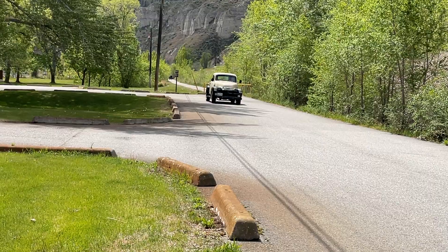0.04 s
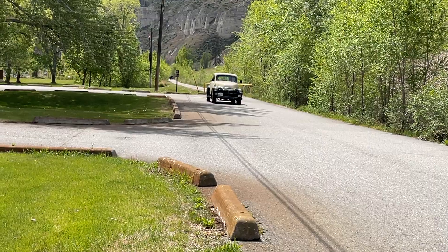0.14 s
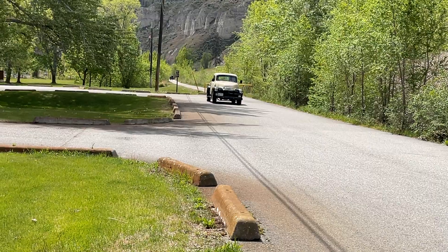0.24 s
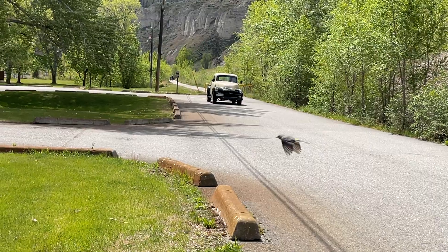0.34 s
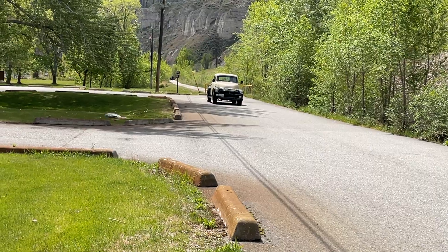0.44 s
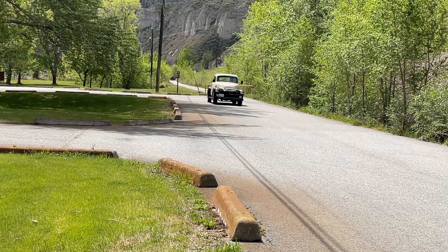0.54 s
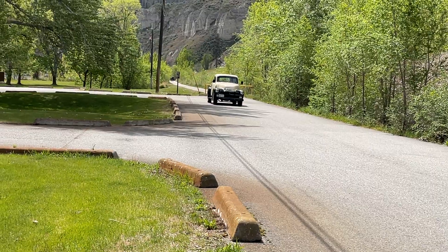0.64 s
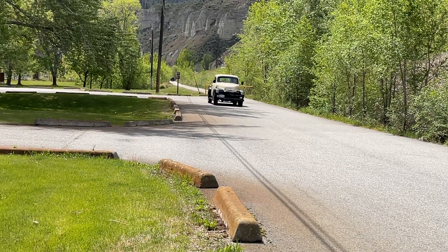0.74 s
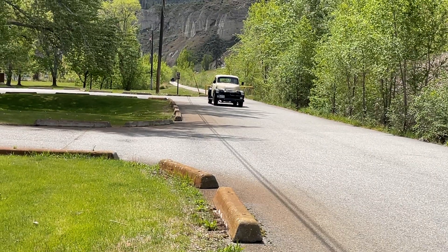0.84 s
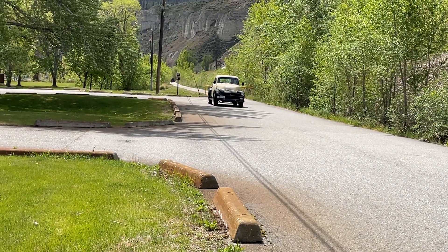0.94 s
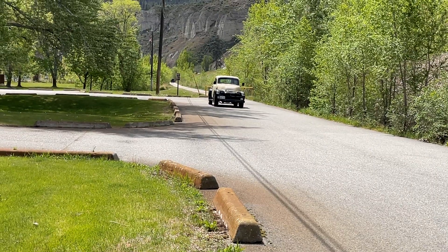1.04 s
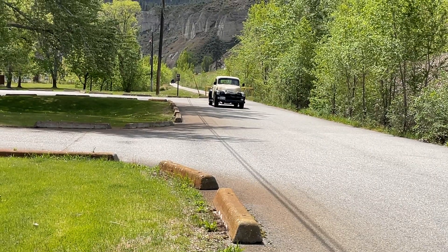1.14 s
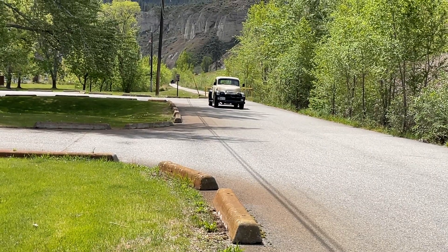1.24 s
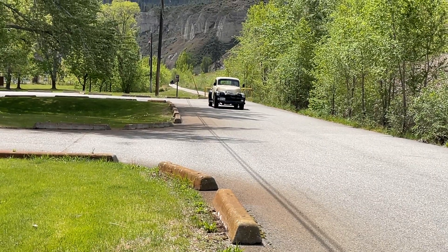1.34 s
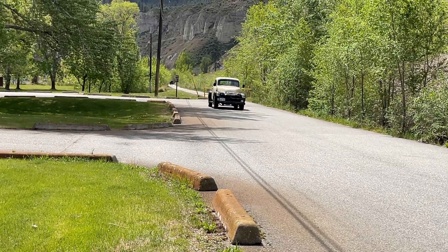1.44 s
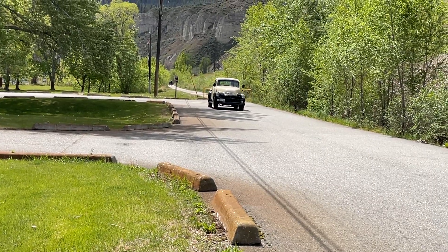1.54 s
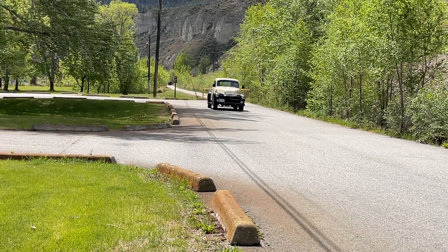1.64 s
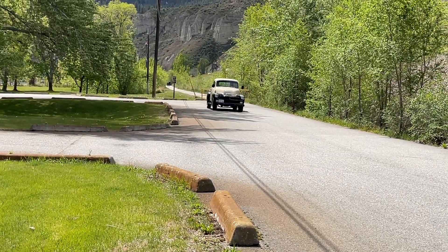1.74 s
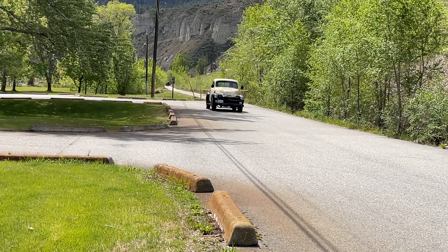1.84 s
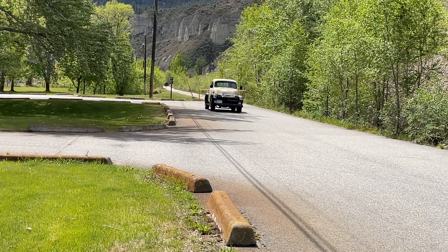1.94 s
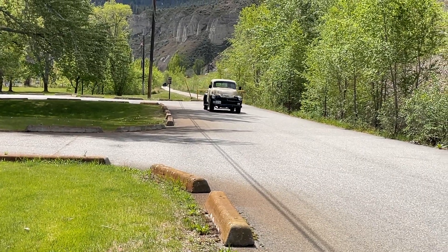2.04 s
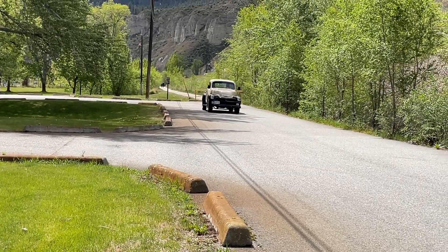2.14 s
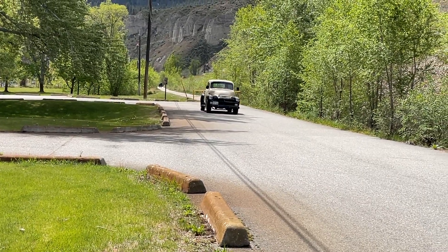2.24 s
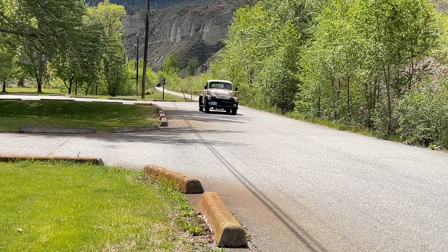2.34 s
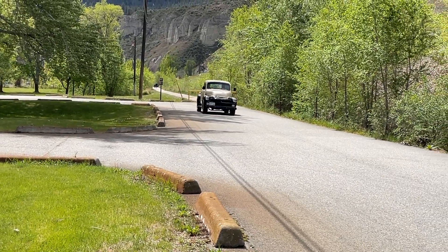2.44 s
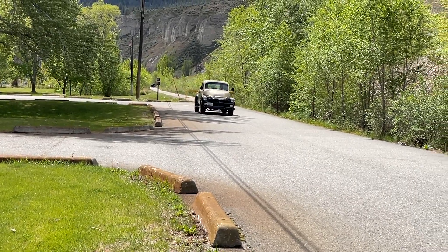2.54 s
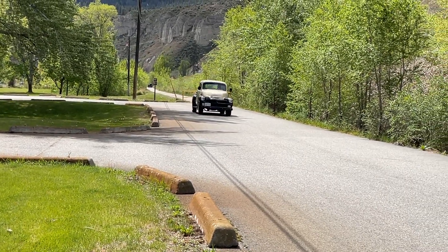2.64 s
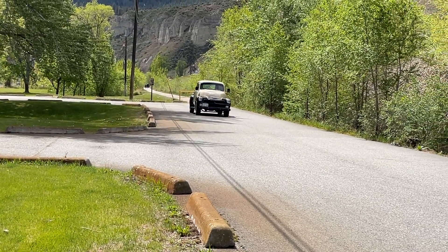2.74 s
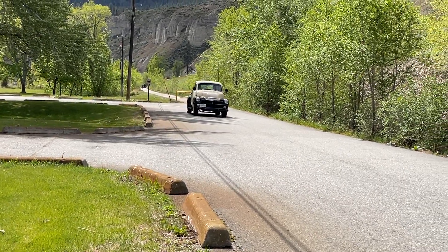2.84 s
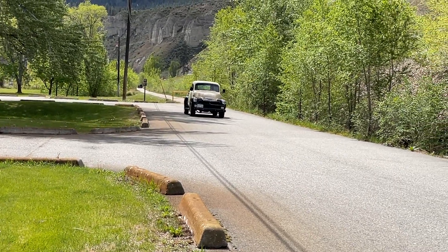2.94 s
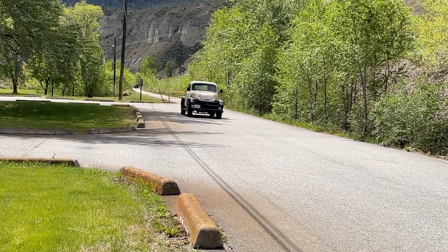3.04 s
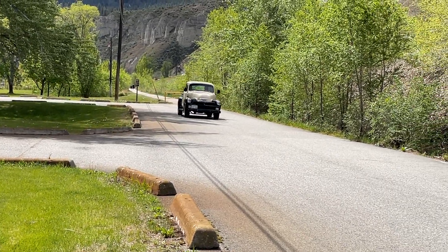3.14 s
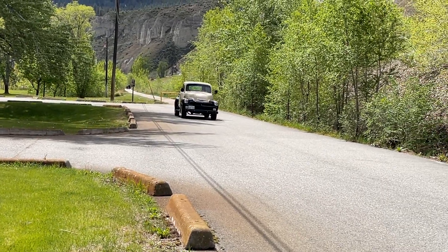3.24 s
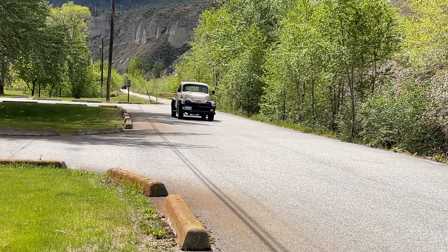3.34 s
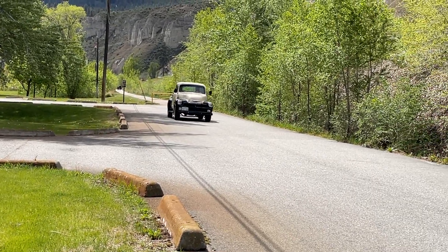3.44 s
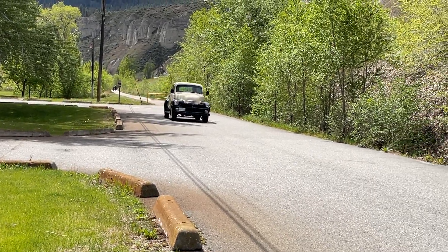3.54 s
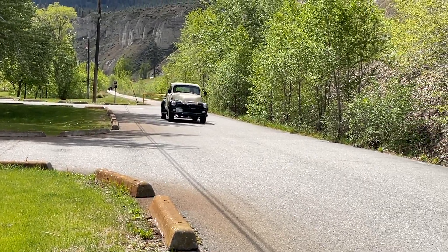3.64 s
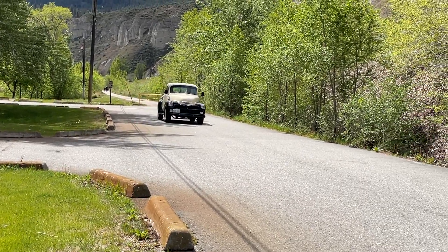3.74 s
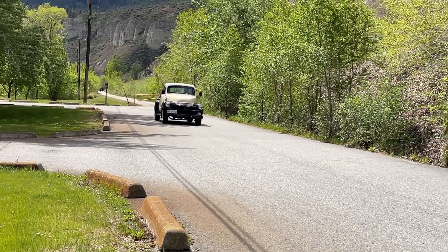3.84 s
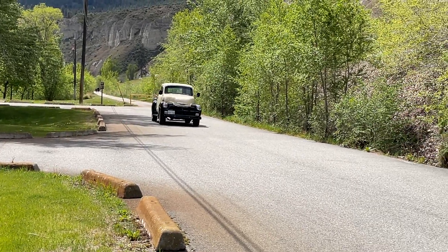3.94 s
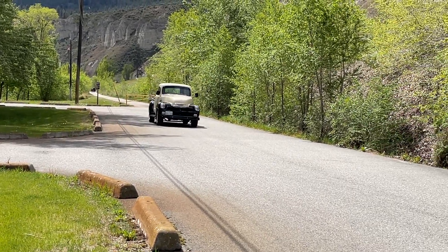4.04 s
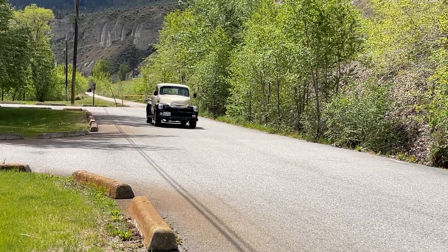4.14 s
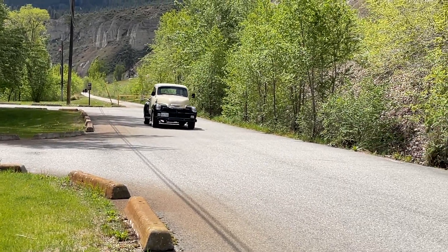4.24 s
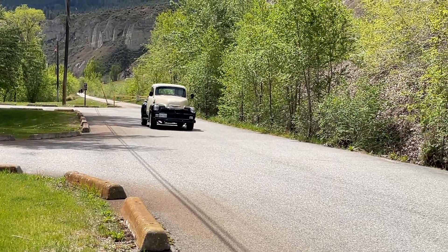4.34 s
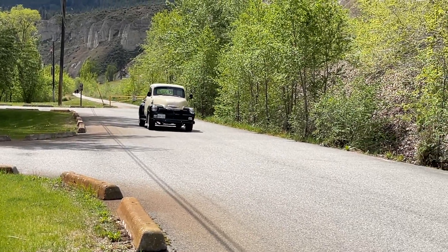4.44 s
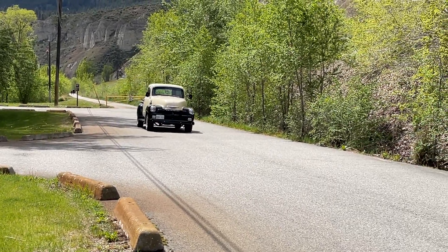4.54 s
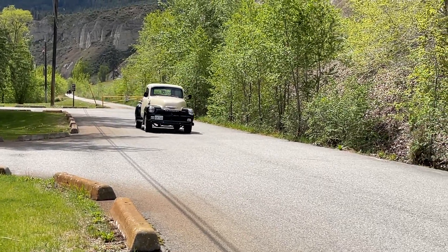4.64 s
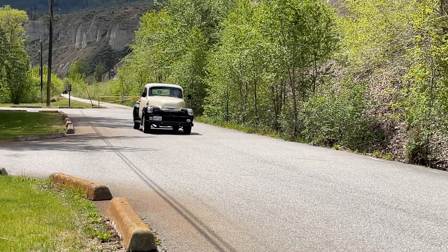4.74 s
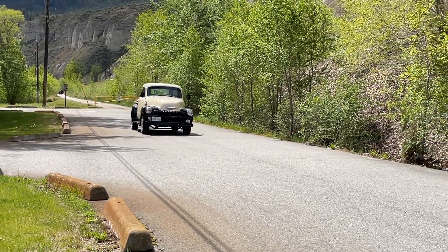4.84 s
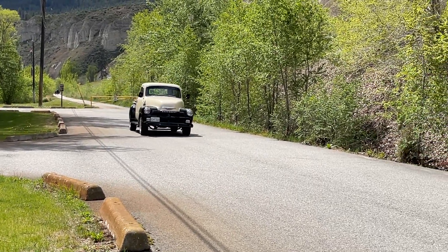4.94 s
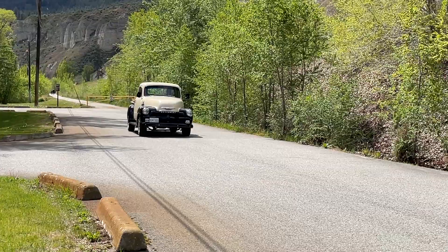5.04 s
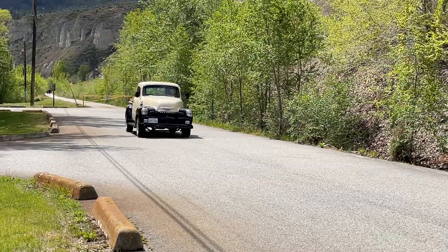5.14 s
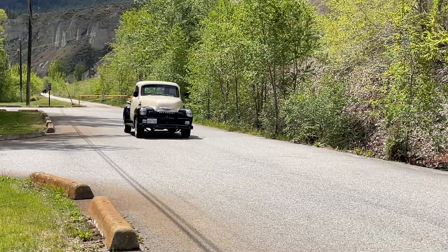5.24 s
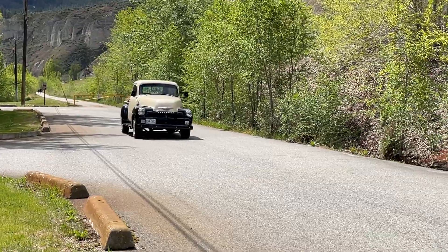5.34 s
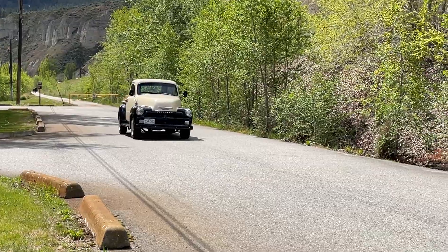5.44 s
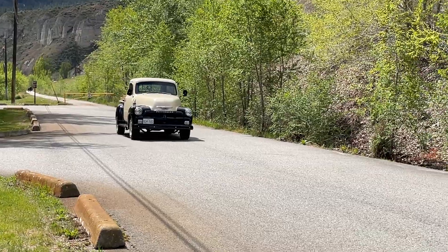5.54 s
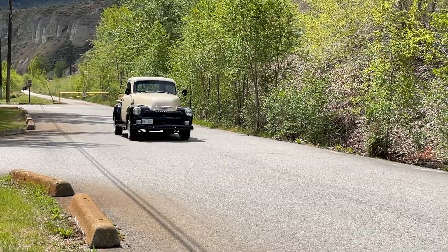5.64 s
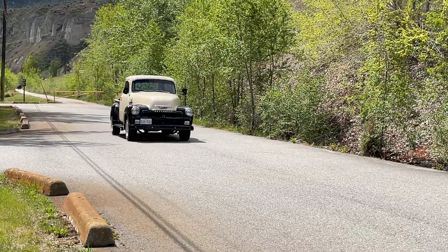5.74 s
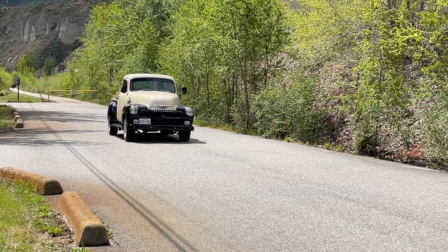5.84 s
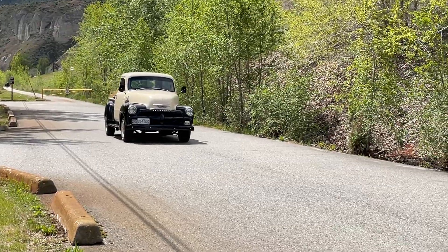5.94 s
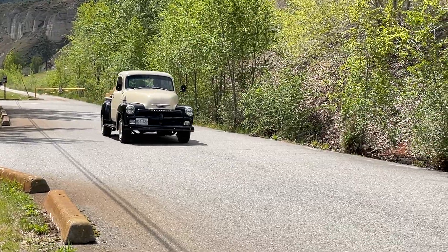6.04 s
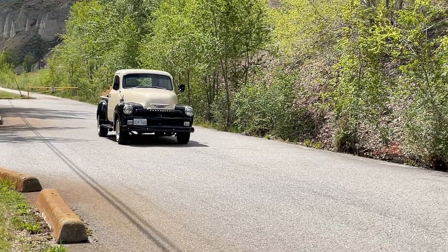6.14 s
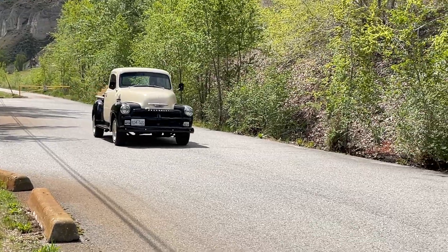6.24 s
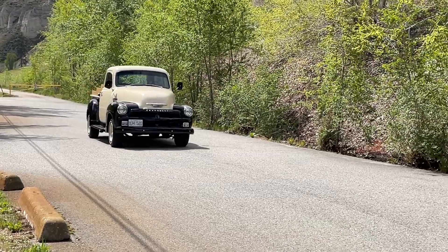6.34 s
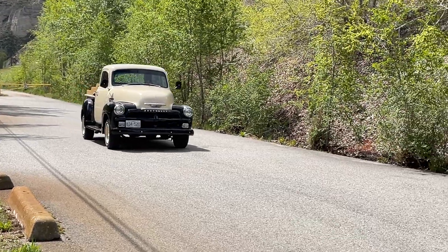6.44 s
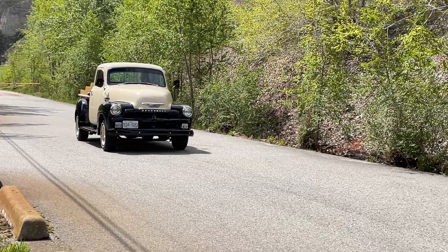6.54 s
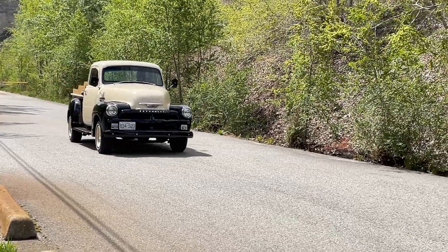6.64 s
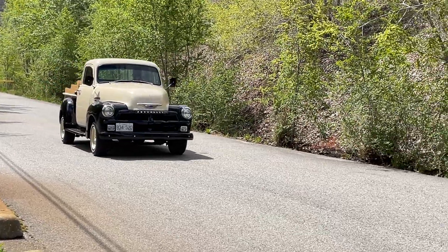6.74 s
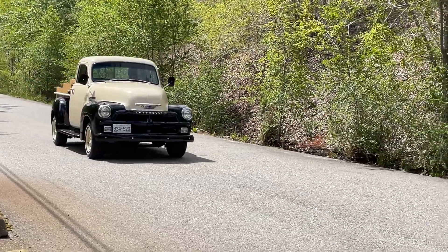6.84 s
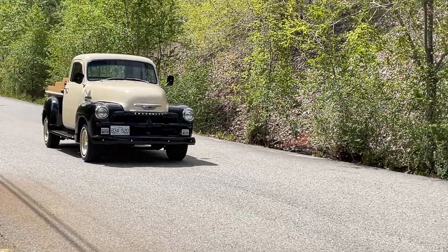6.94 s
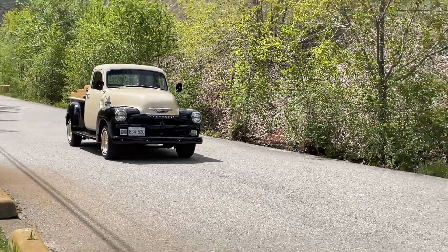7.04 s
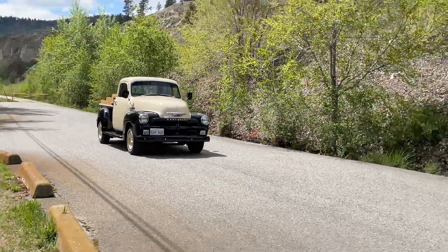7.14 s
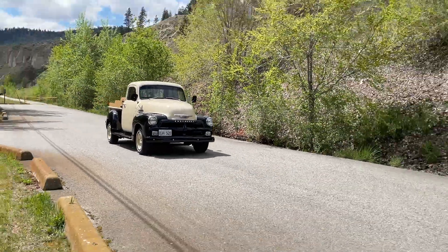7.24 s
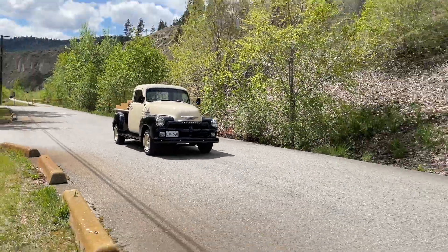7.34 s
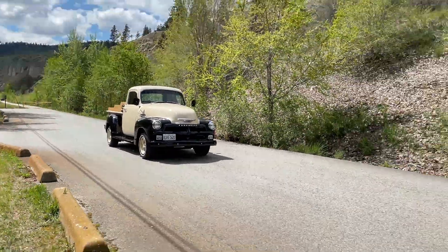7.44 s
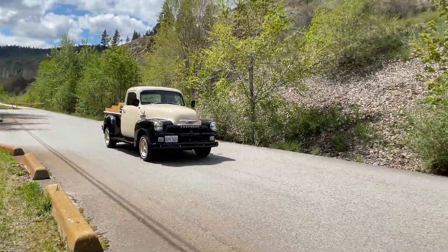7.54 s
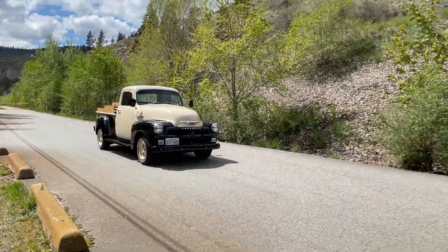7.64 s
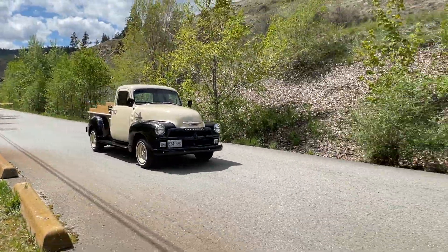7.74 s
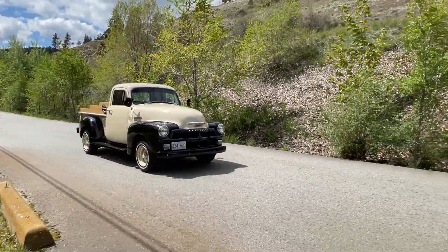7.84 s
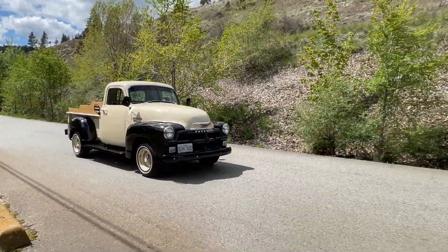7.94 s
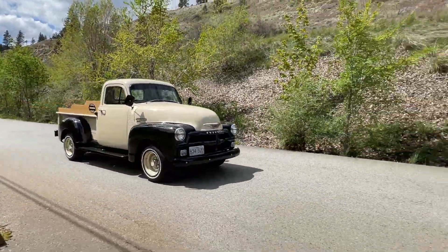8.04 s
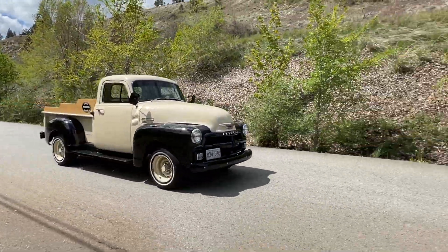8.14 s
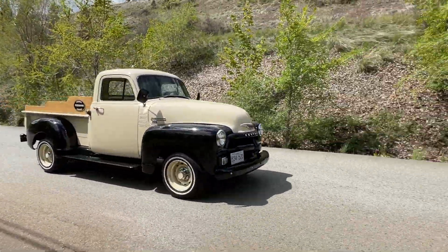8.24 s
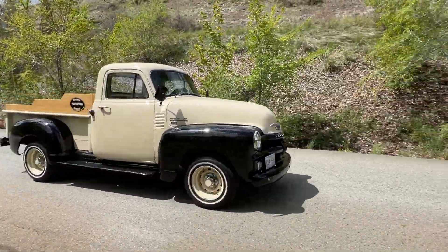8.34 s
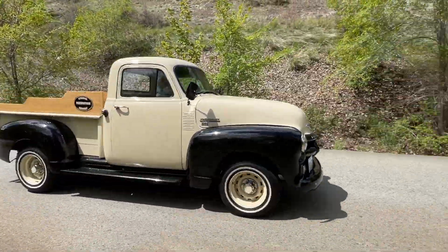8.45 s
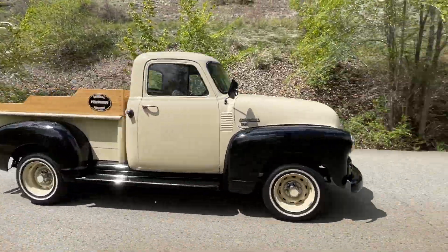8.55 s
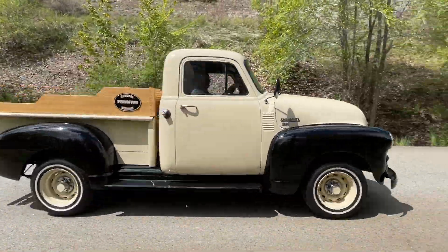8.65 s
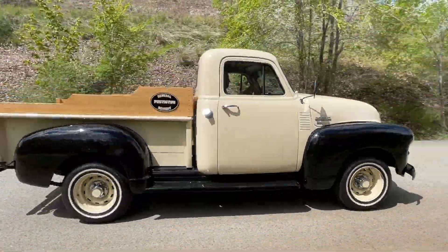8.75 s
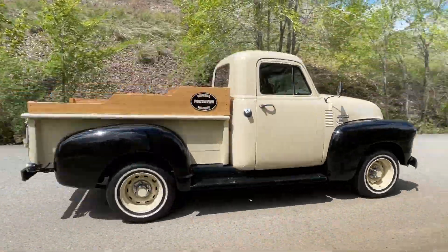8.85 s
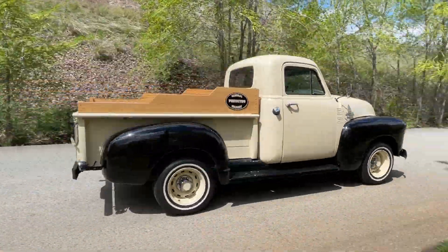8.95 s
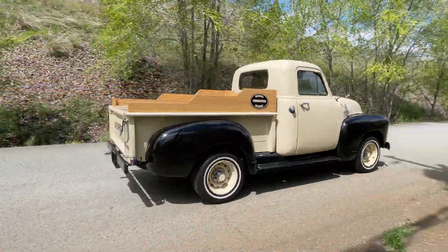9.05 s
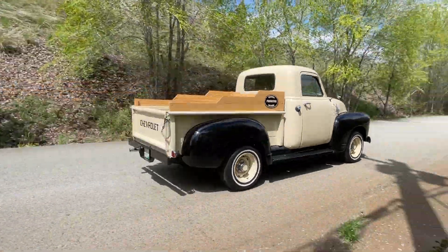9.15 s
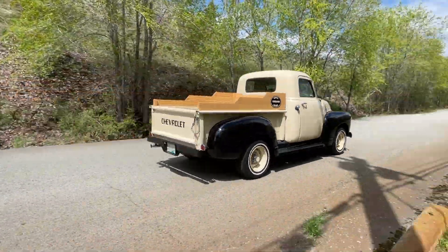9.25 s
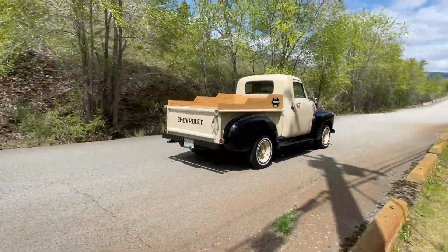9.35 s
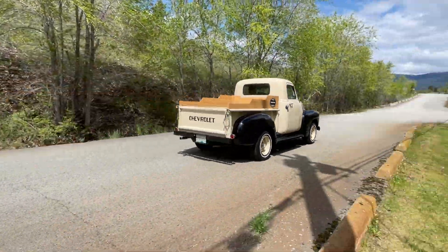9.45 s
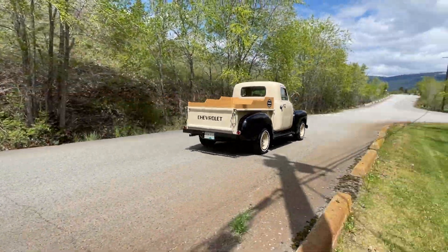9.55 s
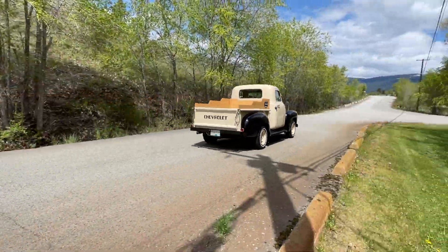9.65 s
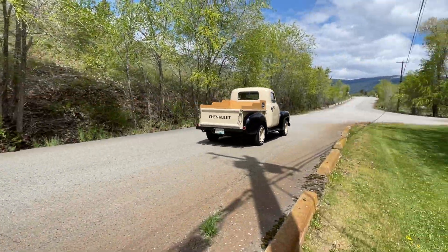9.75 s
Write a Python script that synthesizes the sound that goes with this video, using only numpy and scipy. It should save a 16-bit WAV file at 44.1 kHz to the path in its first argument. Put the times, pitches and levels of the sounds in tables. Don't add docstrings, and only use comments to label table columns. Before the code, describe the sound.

Open-air park road, stereo microphones close to the roadside. From 0 to 1.3 s a distant six-cylinder idle throbs low and faint under soft wind, with leaf rustles near 0.5, 0.95 and 1.25 s. Tiny high bird pips fall between about 0.9 and 2.3 s. At 1.3 s gear whine enters; from 1.6 s the engine climbs in low gear, surging unevenly, its whine brightening through metallic resonances to a peak near 4.3 s. Dull wind thumps strike at 1.5, 2.8, 3.3, 3.9, 4.9 and 5.6-5.8 s. The throttle lifts, whine vanishes and revs sink until 5.7 s. The next gear pulls lower and fuller, rising slowly. From 7.25 s the image widens; fan, exhaust and tyre roar swell to the loudest close pass around 8.7 s, leaning left, then the hiss fades while a deep drone recedes to 9.8 s.

```python
import sys
import numpy as np
from scipy import signal
from scipy.io import wavfile
from scipy.ndimage import uniform_filter1d

SR = 44100
rng = np.random.default_rng(int(sys.argv[2]) if len(sys.argv) > 2 else 0)


def decibels_to_gain(level_db):
    exponent = np.asarray(level_db, float) / 20
    return 10 ** exponent


def file_out(sig):
    cols = np.atleast_2d(sig).T
    lim = np.clip(cols, -1, 1)
    pcm = np.round(lim * 32767).astype(np.int16)
    wavfile.write(sys.argv[1], SR, pcm)


N = 431738
HOP, FRAME = 256, 1024

# time [s], level [dB].
WIND_DB = [(0, -49), (1.45, -34), (1.9, -33.5), (2.75, -36), (2.83, -28.5), (3.16, -30), (3.3, -30),
           (4.96, -25.5), (5.64, -28.5), (5.78, -27.5), (5.92, -32), (5.96, -45), (6.84, -32),
           (6.95, -40.5), (7.82, -34), (8.34, -29), (8.42, -25), (9.79, -31)]
# frequency [Hz], density [dB per Hz].
BUFFET_SPECTRUM = [(12, -41), (20, -26), (49, 9), (97, 16), (219, -17.5), (307, -48), (400, -4), (520, -53),
                   (880, -120)]
# start [s], peak [dB], pitch [Hz].
PUFFS = [(0.05, -31, 110), (1.429, -32.5, 110), (1.545, -16, 76.6), (1.618, -37, 116), (1.813, -20, 96),
         (1.908, -26, 78.1), (2.01, -22.5, 134), (2.048, -27, 103), (2.801, -17.5, 60), (3.345, -13, 60),
         (3.879, -15, 64.8), (4.91, -9.5, 90), (4.951, -13.5, 101), (5.569, -32, 68), (5.591, -18, 77.5),
         (5.614, -25, 86.1), (5.641, -15.5, 94.2), (5.672, -21, 102), (5.707, -15.5, 141),
         (5.746, -12.5, 98.5), (5.768, -23, 69.5)]

# time [s], firing rate [Hz].
FIRING_HZ = [(0, 39.6), (1.2, 39.1), (1.55, 42.6), (2.1, 56.5), (2.6, 69.1), (3.1, 86.1), (3.76, 108.4),
             (4, 119), (4.25, 125.7), (4.39, 128.8), (4.5, 123.6), (4.72, 110.5), (5.3, 83), (5.7, 73),
             (6.15, 74.5), (7.7, 84.5), (8.6, 91.6), (9.79, 97.5)]
# time [s], swing of firing rate [Hz].
LURCHES = [
    (1.76, 3.6),
    (2.26, 2.6),
    (2.68, 2.5),
    (3.15, 5.1),
    (3.54, 4.7),
]
LURCH_S, SETTLE_S = 0.07, 0.25
# time [s], level [dB].
TRUCK_DB = [(0, -66), (1.6, -63), (2.21, -61), (2.78, -55), (3.11, -51), (3.68, -43.5), (4.06, -39.5),
            (4.61, -39.5), (5.1, -46.5), (5.59, -51), (6.57, -45), (6.79, -44.5), (7.58, -39), (8, -36.5),
            (8.4, -33), (8.7, -32.5), (9.05, -34), (9.79, -42)]
# time [s], load [low gear 0, throttle lifted below 0, next gear 1].
LOAD = [
    (4.3, -0.12),
    (4.6, -0.62),
    (5.6, .3),
    (6.3, 0.61),
    (8.7, 1),
    (9.79, 1.4),
]
IDLE_DB, IDLE_END_S, IDLE_HZ, IDLE_WIDTH_HZ = -55, 1.36, 110, 46

# from [Hz], to [Hz].
BANDS_HZ = [
    (200, 600),
    (600, 2000),
    (2000, 7500),
    (9000, 13500),
]
# usual level [dB], share of level change [ratio], gain from load [dB],
# gain from open pair [dB], extra share when near [ratio].
ROAR_BANDS = [
    (-38.5, 0.69, 4, 0, -0.0007),
    (-36, 0.55, 4, 2.5, 0.046),
    (-45, 0.99, -1, -3, -0.027),
    (-67, 1.17, 3.5, -1.5, 0.61),
]
USUAL_DB, NEAR_DB = -45, 6
# frequency [Hz], density [dB per Hz].
BEAM_SPECTRUM = [(24, -40), (40, -33), (109, 8), (177, 0), (275, 3.5), (319, -2), (932, -3.5), (1720, -17),
                 (1890, -13), (2480, -21), (5820, -27), (7250, -45), (8390, -56.5), (9950, -53.5),
                 (13700, -67)]
# frequency [Hz], density [dB per Hz].
WIDE_SPECTRUM = [(40, -28), (90, -8.5), (370, -12), (630, 0.5), (800, -13), (1050, -10.5), (2100, -17),
                 (3400, -35.5), (5000, -46.5), (6000, -64.5), (7200, -26), (10500, -31.5), (12500, -31),
                 (13800, -42)]
# frequency [Hz], side above mid [dB].
BEAM_SIDE_DB = [(60, -21), (140, -13), (480, -17.5), (720, -16), (1300, -19.5), (1720, -5), (2000, -15.5),
                (2500, -23), (2800, -28), (5800, -35.5), (6300, -13), (8700, 15), (10300, -4.5),
                (11300, -2.5)]
# frequency [Hz], side above mid [dB].
WIDE_SIDE_DB = [(60, -13), (200, -9), (660, 16.5), (1200, 27), (2200, 9), (4000, 77), (6000, 37),
                (9000, -31), (10500, 5), (11300, -48), (13000, 13)]
# time [s], opening [beam 0 to open pair 1].
OPENING = [
    (7.25, 0.11),
    (7.45, 0.18),
    (7.9, 0.26),
]
# time [s], from [Hz], to [Hz], depth [dB].
PORT_NOTCH = [
    (7.3, 7980, 8800, -26),
    (7.62, 7800, 8850, -30),
    (7.7, 8200, 8950, -30),
    (7.88, 8850, 9250, -25),
    (8.05, 9000, 9250, -8),
    (9.79, 9000, 9250, -6),
]
# time [s], centre [Hz], depth [dB].
ROAD_DIP = [
    (8.3, 818, 2),
    (8.6, 890, -1.5),
    (9, 872, -2.5),
    (9.4, 735, -6),
    (9.79, 825, -3.5),
]
# time [s], lift near 3 kHz [dB].
TREAD_DB = [
    (7.2, 1),
    (7.6, 2.5),
    (7.9, 4.5),
    (8.3, 2.5),
    (8.7, 0.5),
]
HOOD_HZ, HOOD_WIDTH_HZ, HOOD_DB = 1865, 47, 3.5
# frequency [Hz], level [dB per bin].
LEAF_SPECTRUM = [(2200, -17), (3100, -28), (4000, 5), (5500, -2), (7000, -11.5), (9500, -27), (11500, -35),
                 (13500, -47)]
LEAVES_DB = -93.5
# centre [s], half length [s], lift [dB].
LEAF_GUSTS = [
    (.55, .25, 7),
    (.95, .13, 12),
    (1.24, .12, 11),
    (1.93, .16, 11),
]

# multiple of blade rate, level [dB].
FAN_LINES = [
    (2, 2),
    (3, 0.5),
    (4, 0),
    (7, -9.5),
]
# time [s], level [dB].
FAN_DB = [(0, -59.5), (2.7, -54), (3.45, -42), (3.7, -39), (4.4, -35.5), (4.8, -37.5), (5.3, -43.5),
          (5.6, -45), (6, -41), (7.28, -37), (8.1, -38), (8.9, -31), (9.2, -34), (9.79, -42)]
# time [s], blade rate over
BELT_RATIO = [(0, .916), (3.4, .92), (3.7, .912), (4.72, .917), (5.3, .913), (6.4, .907), (7.6, .917),
              (8.6, .895), (9.79, .891)]
# centre [Hz], width [Hz], gain [dB].
BAY_MODES = [(158.5, 41, -2), (236.3, 32.5, 1.5), (296.3, 36, 0), (349, 92, -5.5), (408, 60, -6.5),
             (465, 26, -3), (670, 66, 8), (769, 91, 8)]

# start [s], peak [dB], pitch [Hz].
PIPS = [(0.9158, -51, 3880), (1.3099, -53, 3900), (1.3758, -51, 3840), (1.4566, -53, 4050),
        (1.5359, -52, 3940), (1.586, -53.5, 4040), (1.6746, -69, 3870), (1.783, -52, 3830),
        (1.8218, -49, 3970), (2.0073, -50.5, 4030), (2.274, -53, 4090)]

# time [s], whine level [dB].
GEAR_DB = [(1.26, -51), (1.34, -44), (1.46, -46), (1.7, -43.5), (2.06, -41.5), (3, -36.5), (4.25, -29.5),
           (4.34, -36), (4.46, -49)]
# partial, level at middle revs [dB], slope [dB per Hz of firing rate].
TEETH = [(1, -0.5, 0), (2, 1, 0), (3, -6, -0.0777), (4, -9.5, -0.1769), (5, -19, 0.07)]
MIDDLE_HZ = 80
# centre [Hz], width [Hz], gain [dB].
CASE_MODES = [(319, 14, -6), (385, 23, 1), (466, 43, -5), (543, 60, -1.5), (657, 57, -2), (832, 58, -2.5),
              (879, 45, -0.5), (977, 40, -1.5), (1050, 58, 0), (1147, 120, -6.5), (1306, 61, -6.5),
              (1860, 60, -9)]

# time [s], level [dB].
EXHAUST_DB = [(1.8, -48), (2.05, -30), (2.55, -31), (2.75, -38), (3.45, -33.5), (3.7, -28), (4.55, -19.5),
              (4.95, -20.5), (5.1, -30), (6.2, -33), (6.6, -19.5), (6.85, -32), (7.5, -30), (7.7, -20),
              (8.05, -21), (8.3, -16), (8.66, -11), (9.79, -12.5)]
# frequency [Hz], gain [dB].
PIPE_RESPONSE = [(55, -22), (75, -16), (95, -7), (122, -0.5), (135, -3), (150, -15.5), (190, -20),
                 (260, -26.5)]
# crank order, level [dB], gain under load [dB].
PIPE_ORDERS = [
    (3, 0.5, 0),
    (4, -18, 3.5),
    (6, -1, -1),
]
# crank order, level above truck [dB].
UNEVEN_ORDERS = [(5, -27), (9, -17.5), (10, -22.5), (12, -26), (16, -23.5), (17, -21), (20, -21.5)]
TOP_GEAR_DB = 14
# time [s], level [dB].
NEXT_GEAR_DB = [(5.9, -65), (6.2, -49), (7.15, -43), (7.5, -41), (8.05, -36), (8.66, -43), (9.28, -40.5),
                (9.79, -35.5)]
# time [s], depth [dB].
ECHO_BEATS = [
    (8.48, -7),
    (8.98, -5.5),
]
BEAT_S = 0.14

# time [s], left above right [dB].
LEAN_DB = [(0, 2), (7.2, -1), (7.6, 3.5), (8.2, 4.5), (8.75, 13.5), (9.2, 11.5), (9.79, 4)]
# time [s], left late [samples].
LATE_SAMPLES = [
    (7.7, -1),
    (8.25, 1),
    (8.75, 5),
    (9.25, 2),
    (9.79, -2),
]


def evened(x):
    return x / np.sqrt(np.mean(abs(x) ** 2) + 1e-20)


def read(points, hz):
    f, value = np.transpose(points)
    return np.interp(np.log(hz + 1), np.log(f + 1), value)


def columns(rows, t):
    s, *values = np.transpose(rows)
    return [np.interp(t, s, v) for v in values]


def drift(t, fastest_hz, count=24):
    rates_hz = np.geomspace(fastest_hz / 20, fastest_hz, count)
    return evened(sum(np.sin(2 * np.pi * (f * t + rng.random())) / np.sqrt(f) for f in rates_hz))


def add(mix, s, sound):
    part = mix[round(s * SR):][:len(sound)]
    part += sound[:len(part)]


def power_sum_db(level_db):
    return 10 * np.log10((decibels_to_gain(level_db) ** 2).sum(axis=0))


def bell(x, centre, width):
    return np.exp(-((x - centre) / width) ** 2)


def after(rows, t):
    return np.clip(1 + (t - rows[0][0]) / 0.3, 0, 1)


def spectrum_axes():
    return np.arange(N // HOP + 5) * HOP / SR, np.fft.rfftfreq(FRAME, 1 / SR)


def noise(magnitude):
    a, b = rng.standard_normal(magnitude.T.shape + (2,)).T
    unit = signal.istft(a + 1j * b, nperseg=FRAME, noverlap=FRAME - HOP)[1]
    shaped = signal.istft((a + 1j * b) * magnitude, nperseg=FRAME, noverlap=FRAME - HOP)[1]
    return shaped[:N] * np.sqrt(len(magnitude)) / np.std(unit)


def tones(hz, lines, waver_db, stray_turns, start_s=-1, end_s=99):
    t, coarse = np.arange(N) / SR, np.arange(N // HOP + 2) * HOP / SR
    fade = np.clip(np.minimum(t - start_s, end_s + 0.05 - t) / 0.05, 0, 1)
    on = fade > 0
    turns = np.cumsum(np.interp(t, coarse, hz))[on] / SR
    out = np.zeros(N)
    for k, db in lines:
        level = np.interp(t[on], coarse, decibels_to_gain(db + waver_db * drift(coarse, 14.0)))
        stray = stray_turns * np.interp(t[on], coarse, drift(coarse, 14.0))
        out[on] += level * np.cos(2 * np.pi * (k * turns + stray))
    return np.sqrt(2) * out * fade


def ring_db(modes, hz):
    power = sum(decibels_to_gain(db) ** 2 / (1 + (2 * (hz - f) / width) ** 2) ** 2 for f, width, db in modes)
    return 10 * np.log10(power)


def wind():
    t, hz = spectrum_axes()
    shape_db = read(BUFFET_SPECTRUM, hz)
    shape_db = shape_db - power_sum_db(shape_db[hz < 90])
    level = decibels_to_gain(shape_db[:, None] + columns(WIND_DB, t)[0] + 2.1 * drift(t, 40.0))
    mid, side = noise(level), noise(level)
    u = np.arange(4000) / SR
    sag_s = 0.0034 * (1 - np.exp(-u / 0.0063))
    envelope = u / 0.0071 * np.exp(1 - u / 0.0053)
    for s, db, f in PUFFS:
        add(mid, s, decibels_to_gain(db) * np.sin(2 * np.pi * f * (u + sag_s)) * envelope)
    return mid, decibels_to_gain(-16.5) * side


def engine_speed(t):
    swing_hz = sum(f * np.tanh((t - s) / LURCH_S) * np.exp(-abs(t - s) / SETTLE_S) for s, f in LURCHES)
    return columns(FIRING_HZ, t)[0] + swing_hz


def idle(hz):
    lines = [(k / 3, IDLE_DB - 4.3 * ((hz * k / 3 - IDLE_HZ) / IDLE_WIDTH_HZ) ** 2) for k in range(4, 15)]
    return tones(hz, lines, 2, 0.06, end_s=IDLE_END_S)


def leaves_db(t, hz):
    gust_db = LEAVES_DB + sum(db * bell(t, s, half_s) for s, half_s, db in LEAF_GUSTS)
    return read(LEAF_SPECTRUM, hz)[:, None] + gust_db


def port_notch_db(t, hz):
    lo_hz, hi_hz, depth_db = columns(PORT_NOTCH, t)
    lo_hz = lo_hz + 130 * drift(t, 60.0)
    hi_hz = hi_hz + 130 * drift(t, 60.0)
    inside_hz = np.minimum(hz[:, None] - lo_hz, hi_hz - hz[:, None])
    return depth_db * np.clip(0.5 + inside_hz / 210.0, 0, 1)


def roar():
    t, hz = spectrum_axes()
    opening, load = columns(OPENING, t)[0], columns(LOAD, t)[0]

    def blend(beam, wide):
        return np.outer(read(beam, hz), 1 - opening) + np.outer(read(wide, hz), opening)

    shape_db = blend(BEAM_SPECTRUM, WIDE_SPECTRUM)
    change_db = columns(TRUCK_DB, t)[0] - USUAL_DB
    near_db = np.maximum(change_db - NEAR_DB, 0)
    gaps_db = []
    for (lo, hi), (db, share, load_db, open_db, extra) in zip(BANDS_HZ, ROAR_BANDS):
        band_db = db + share * change_db + load_db * load + open_db * opening + extra * near_db
        gaps_db.append(band_db - power_sum_db(shape_db[(hz >= lo) & (hz < hi)]))
    centres = np.log([np.sqrt(lo * hi) for lo, hi in BANDS_HZ])
    weights = np.transpose([np.interp(np.log(hz + 1), centres, row) for row in np.eye(len(BANDS_HZ))])

    patches = rng.standard_normal((len(t), len(hz))).T
    patches = evened(uniform_filter1d(uniform_filter1d(patches, size=8, axis=0), size=16, axis=1))
    lumps_db = (0.8 + 0.7 * opening) * patches + 0.25 * drift(t, 8.0)
    level_db = shape_db + weights @ gaps_db + lumps_db

    dip_hz, dip_db = columns(ROAD_DIP, t)
    level_db = level_db + after(ROAD_DIP, t) * dip_db * bell(hz[:, None], dip_hz, 140.0)
    tread_db = after(TREAD_DB, t) * columns(TREAD_DB, t)[0]
    level_db = level_db + np.outer(bell(hz, 3000.0, 1070.0), tread_db)
    level_db = level_db + HOOD_DB * np.outer(bell(hz, HOOD_HZ, HOOD_WIDTH_HZ), 1 - after(OPENING, t))
    level_db = 10 * np.log10(decibels_to_gain(level_db) ** 2 + decibels_to_gain(leaves_db(t, hz) + lumps_db) ** 2)

    mid = noise(decibels_to_gain(level_db + port_notch_db(t, hz)))
    side = noise(decibels_to_gain(level_db + blend(BEAM_SIDE_DB, WIDE_SIDE_DB)))
    return mid, side


def fan(t, hz):
    blade_hz = hz * columns(BELT_RATIO, t)[0]
    fan_db = columns(FAN_DB, t)[0]
    lines = [(k, fan_db + db + ring_db(BAY_MODES, k * blade_hz)) for k, db in FAN_LINES]
    return tones(blade_hz, lines, 1.8, 0.04)


def bird():
    out, u = np.zeros(N), np.arange(1300) / SR
    for s, db, f in PIPS:
        add(out, s, decibels_to_gain(db - 6) * np.sin(2 * np.pi * (f + 90 - 3000 * u) * u) * np.hanning(len(u)))
    decay_db = -60 * np.arange(SR // 4) / SR / 0.52
    echoes = rng.standard_normal(SR // 4) * decibels_to_gain(decay_db)
    echoed = signal.oaconvolve(out, echoes / np.linalg.norm(echoes))[:N]
    return decibels_to_gain(-2.0) * out + decibels_to_gain(-7.0) * echoed


def gear(t, hz):
    mesh_hz = hz * 7 / 2
    gear_db = columns(GEAR_DB, t)[0]
    lines = []
    for k, db, slope_db in TEETH:
        lines.append((k, gear_db + db + slope_db * (hz - MIDDLE_HZ) + ring_db(CASE_MODES, k * mesh_hz)))
    return tones(mesh_hz, lines, 0.9, 0.03, GEAR_DB[0][0], GEAR_DB[-1][0])


def exhaust(t, hz):
    truck_db, load = columns(TRUCK_DB, t)[0], columns(LOAD, t)[0]
    pipe_db = columns(EXHAUST_DB, t)[0]
    beat_db = sum(db * bell(t, s, BEAT_S) for s, db in ECHO_BEATS)
    lines = []
    for k, db, load_db in PIPE_ORDERS:
        level_db = pipe_db + db + load_db * load + read(PIPE_RESPONSE, hz * k / 3)
        lines.append((k / 3, level_db + beat_db * (k == 3)))
    lines += [(k / 3, truck_db + db + TOP_GEAR_DB * load) for k, db in UNEVEN_ORDERS]
    lines.append((14 / 3, columns(NEXT_GEAR_DB, t)[0]))
    return tones(hz, lines, 0.7, 0.015, EXHAUST_DB[0][0])


def scene():
    t, coarse = np.arange(N) / SR, np.arange(N // HOP + 2) * HOP / SR
    hz = engine_speed(coarse)
    wind_mid, wind_side = wind()
    pipe = idle(hz) + exhaust(coarse, hz)
    roar_mid, roar_side = roar()
    blades = fan(coarse, hz)
    truck = roar_mid + gear(coarse, hz) + blades + pipe

    middle_band = signal.butter(1, [520, 7000], "bandpass", fs=SR, output="sos")
    lean = np.tanh(columns(LEAN_DB, t)[0] * np.log(10) / 40) * signal.sosfilt(middle_band, truck)
    late = columns(LATE_SAMPLES, t)[0] * (t > LATE_SAMPLES[0][0])
    bass = signal.sosfilt(signal.butter(2, 1200, fs=SR, output="sos"), truck)
    delay = -late / 2 * np.gradient(bass)
    spread = decibels_to_gain(-33.5) * np.roll(pipe + blades, 90)

    side = roar_side + wind_side + lean + delay + spread
    mid = truck + wind_mid + bird()
    return np.array([mid + side, mid - side])


def roll_off(x):
    return signal.sosfilt(signal.butter(12, 13820, fs=SR, output="sos"), x)


def record(dry):
    thin = signal.sosfilt(signal.butter(4, 40.0, "highpass", fs=SR, output="sos"), dry)
    return roll_off(thin)


dry = scene()
out = record(dry)
file_out(out)
```